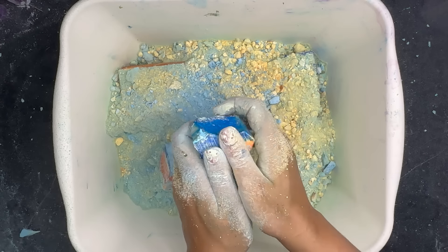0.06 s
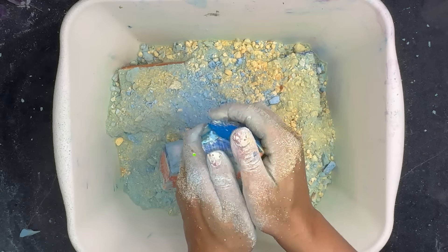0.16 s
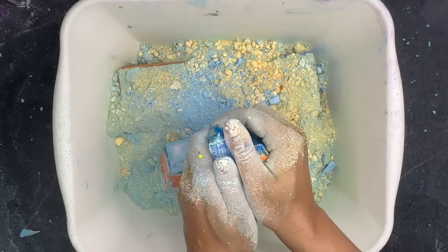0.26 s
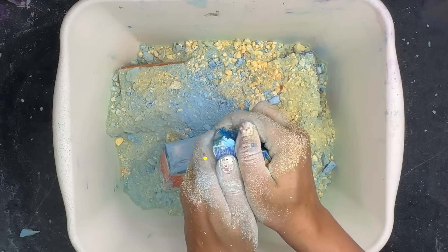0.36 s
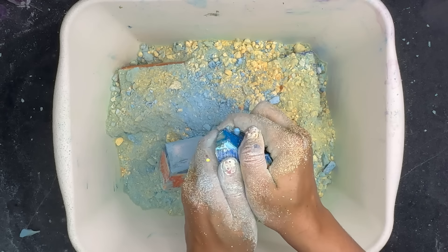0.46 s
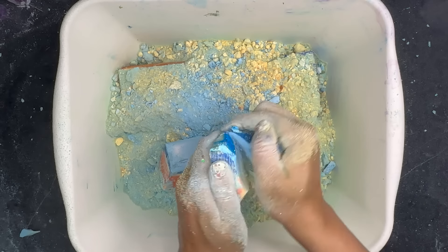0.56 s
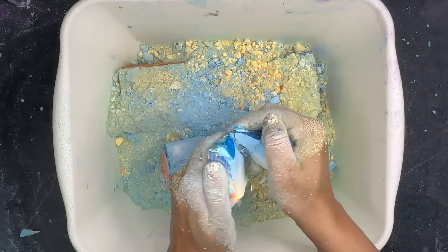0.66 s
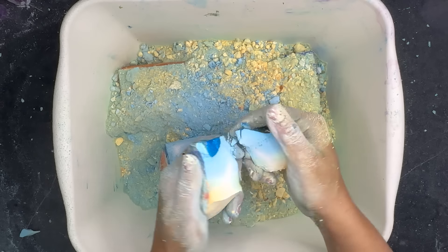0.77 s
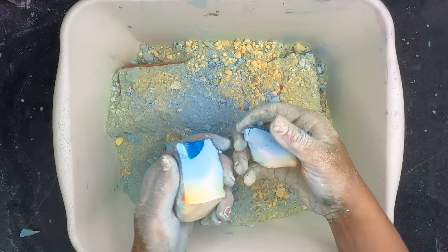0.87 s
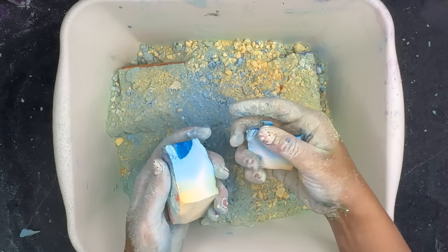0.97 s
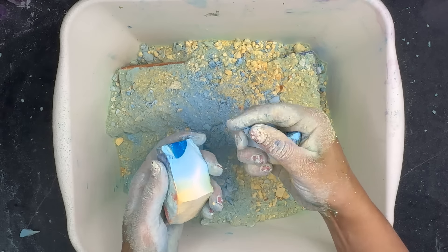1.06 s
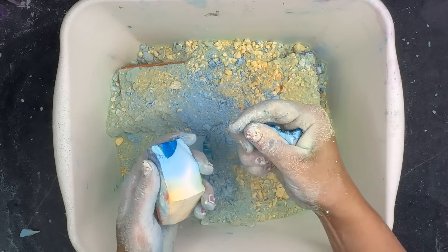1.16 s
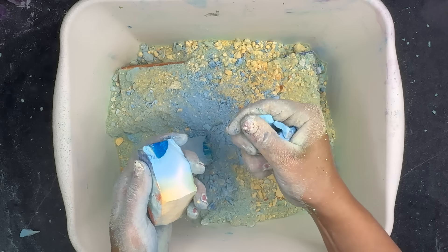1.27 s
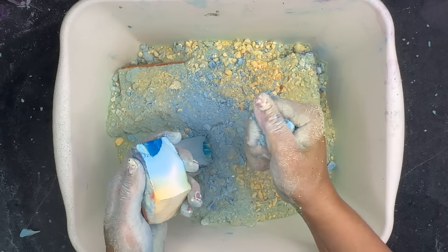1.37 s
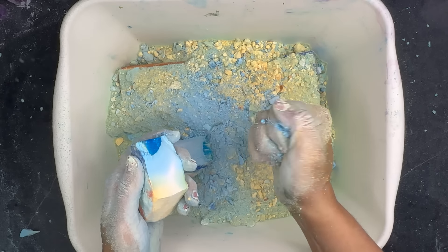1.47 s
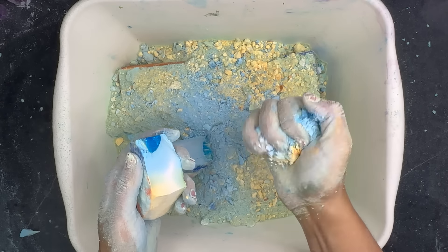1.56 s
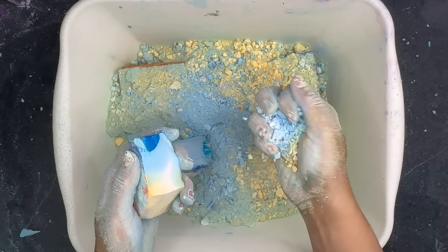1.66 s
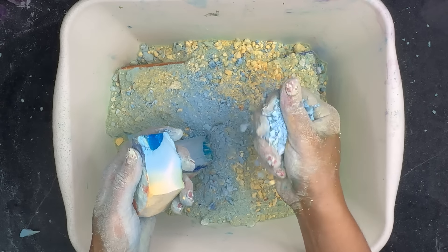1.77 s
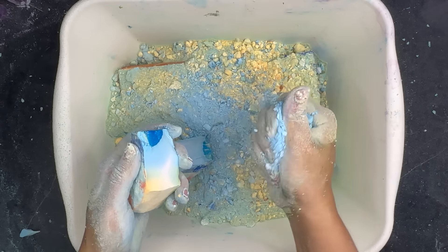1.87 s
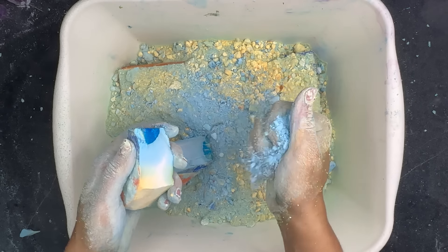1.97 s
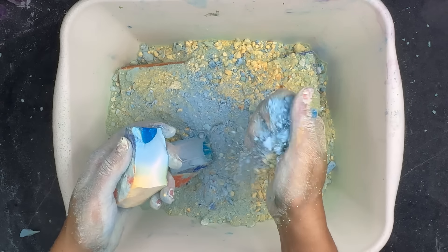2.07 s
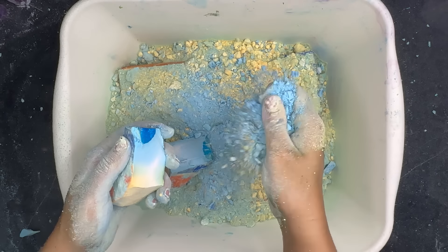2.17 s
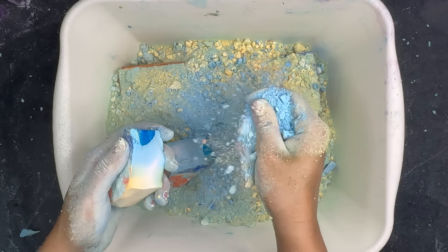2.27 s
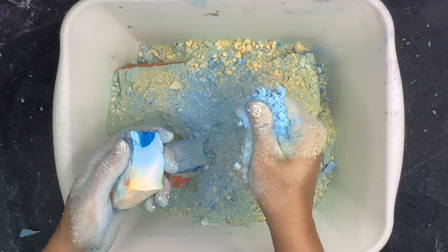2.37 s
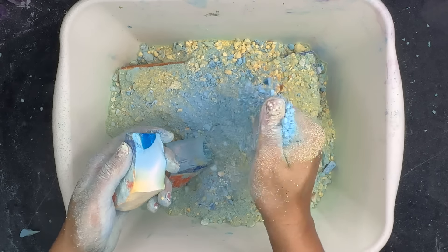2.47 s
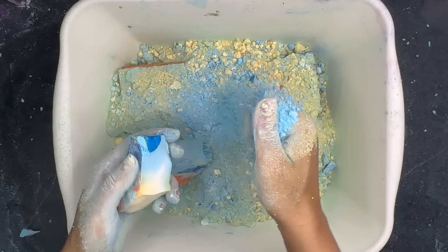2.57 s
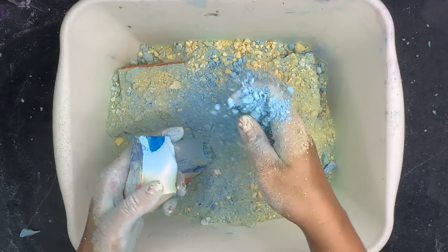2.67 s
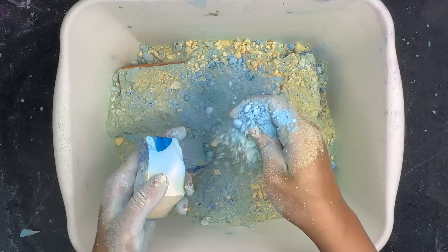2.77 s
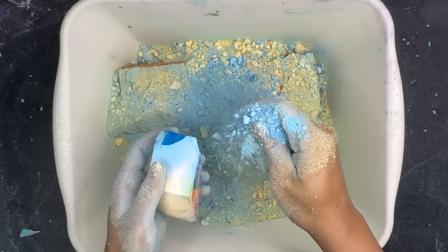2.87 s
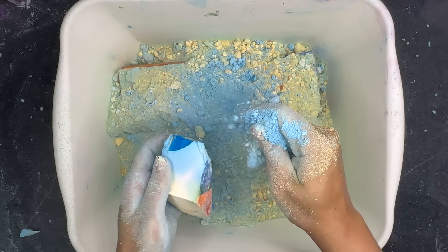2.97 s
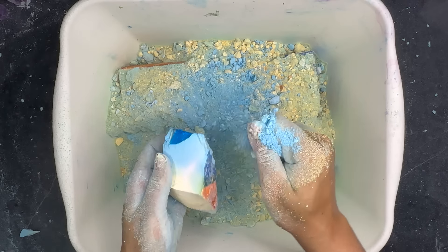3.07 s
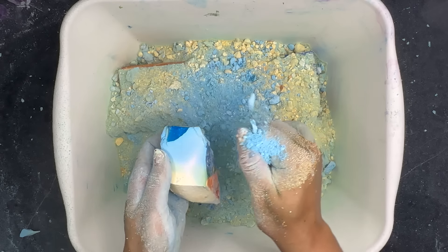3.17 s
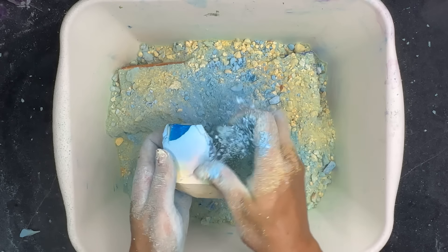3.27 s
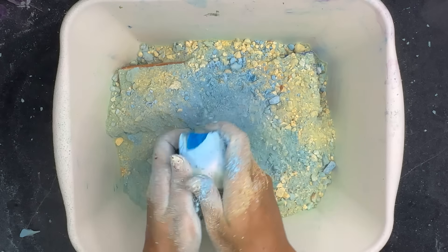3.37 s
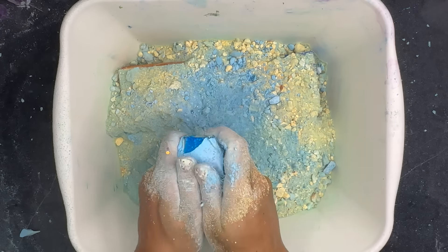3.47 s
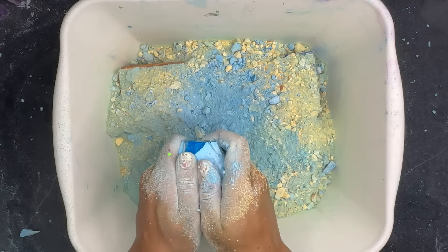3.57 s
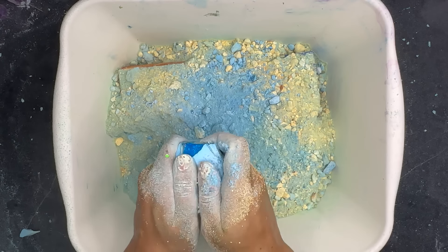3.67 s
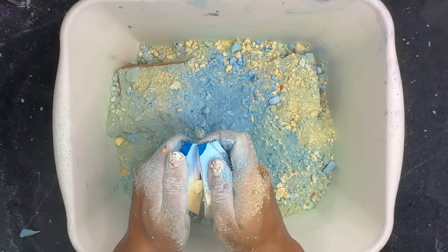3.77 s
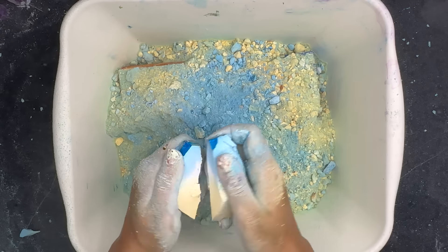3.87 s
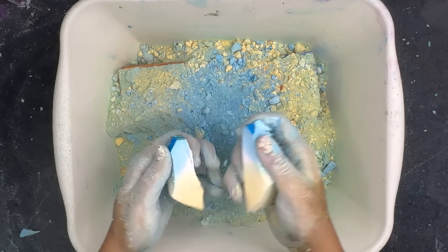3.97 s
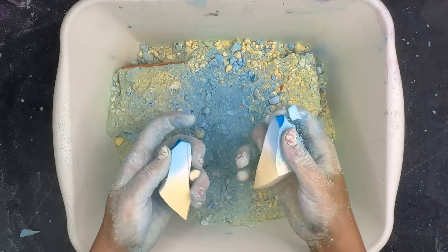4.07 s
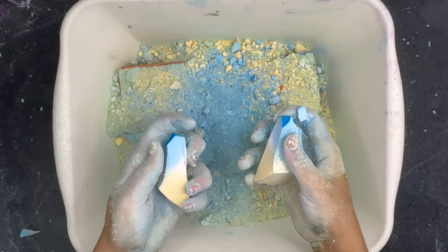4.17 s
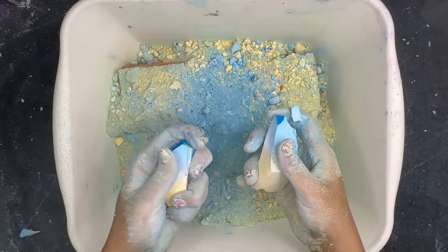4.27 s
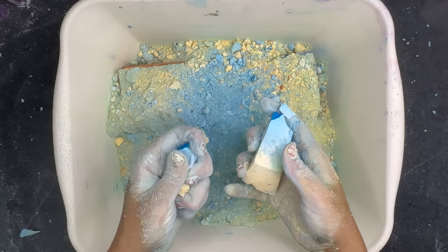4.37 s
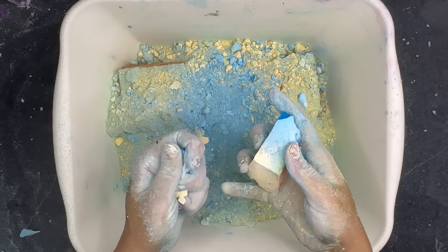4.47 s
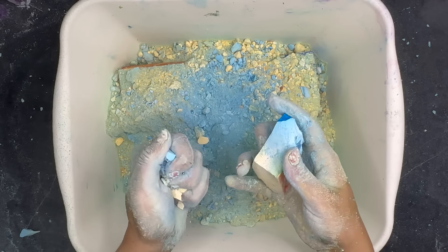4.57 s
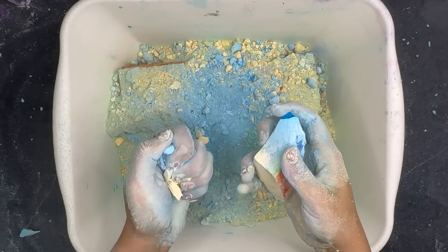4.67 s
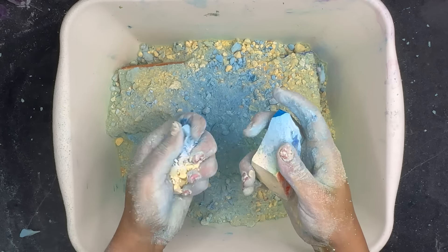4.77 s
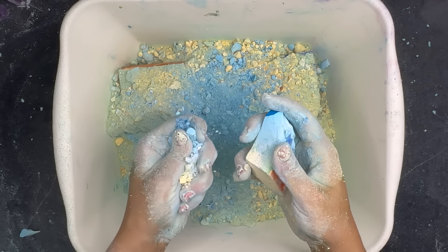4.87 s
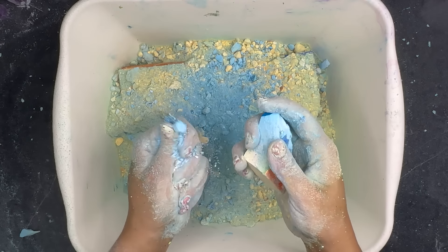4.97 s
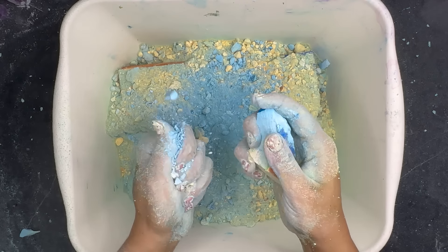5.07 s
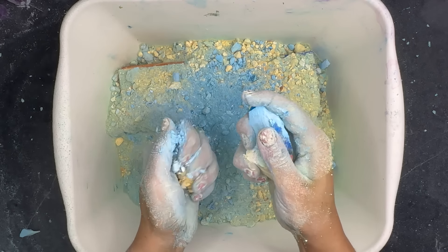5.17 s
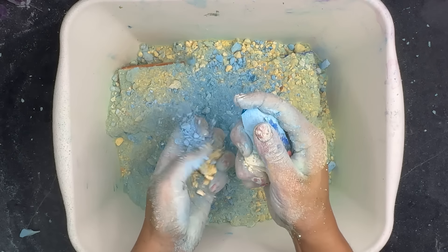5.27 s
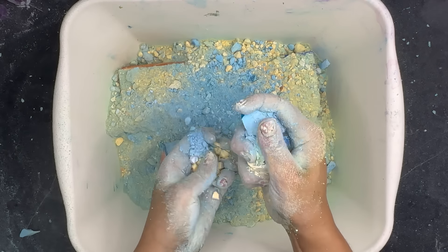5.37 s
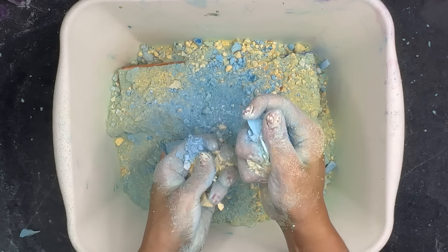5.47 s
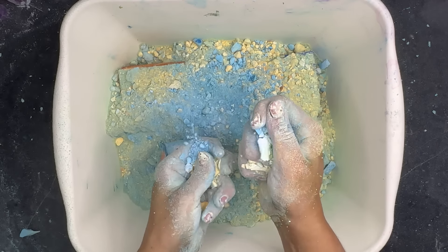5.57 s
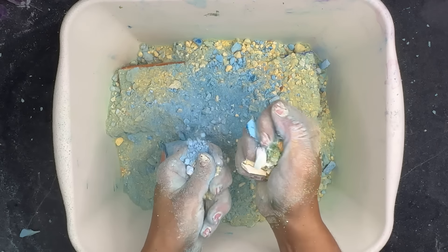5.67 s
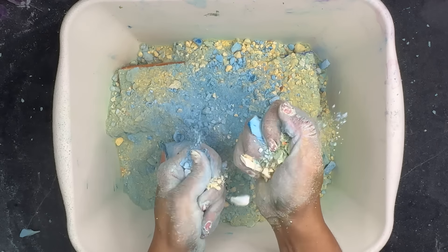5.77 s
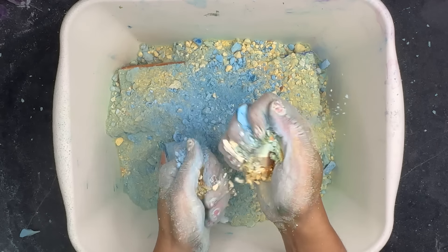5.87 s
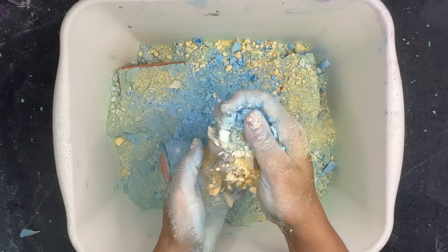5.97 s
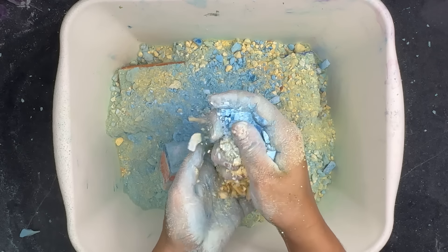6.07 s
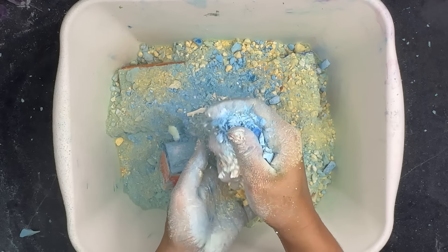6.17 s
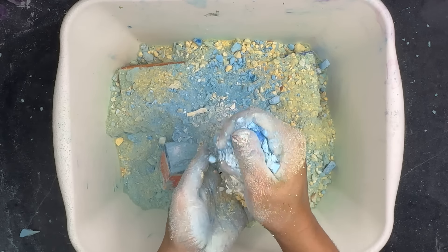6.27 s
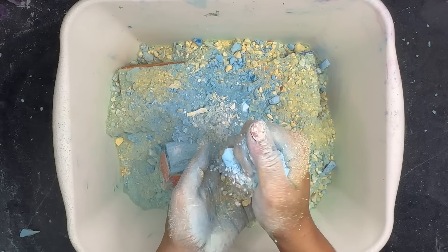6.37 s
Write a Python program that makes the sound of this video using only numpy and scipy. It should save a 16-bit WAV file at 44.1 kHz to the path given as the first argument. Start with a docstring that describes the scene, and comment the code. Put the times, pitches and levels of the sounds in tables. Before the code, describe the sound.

Close to a stereo microphone in a quiet room, hands rub powdery chalk, then break a block with a snap and crush it in a burst of crunches. A heavy lump falls with a low thump. Softer squeezing and trickling follow, then a rub, a very sharp crack and dense crumbling to the end, over a faint low hum.

```python
"""A low room drone and soft powdery rubbing come first; then hands break and crumble blocks of gym chalk over a tub.
Blocks snap and ring as short sine tones in the cupped hands, with noise for the crack and a spray of crumbs.
Crumbs grind as clumped filtered clicks, chips tick as tiny sines, lumps thud as low noise in the chalk bed.
A close pair of microphone ports hears it in a quiet room, with echoes from tub, walls and room."""
import sys
import numpy as np
from scipy import signal
from scipy.fft import rfft, irfft, next_fast_len
from scipy.io import wavfile
from scipy.ndimage import uniform_filter1d

SR = 44100
rng = np.random.default_rng(int(sys.argv[2]) if len(sys.argv) > 2 else 0)


def transcribe(signal):
    """Save signal, clipped to [-1, 1], as a 16-bit WAV file at the path in sys.argv[1]."""
    frames = np.atleast_2d(signal).T
    limited = np.clip(frames, -1, 1)
    pcm = np.round(limited * 32767).astype(np.int16)
    wavfile.write(sys.argv[1], SR, pcm)


N = 282681
TIME = np.arange(N) / SR

# spectrum of splitting chalk: frequency_hz, level_db (relative, per Hz)
CRACK_SPECTRUM = [(300, -26), (900, -22), (2400, 8.5), (3200, -4), (4200, 6), (5100, 1), (6500, 8.5),
                  (8500, 1.5), (15000, 3.5)]
# the fingers close on the crumbs: peak_s, grinding_db, hold_s, treble_db
# loose powder is dull, fresh shards are bright
SQUEEZES = [(1.078, -51.5, 0.12, 6.5), (1.207, -39.5, 0.1, 0), (1.315, -39, 0.0054, 8),
            (1.45, -50, 0.61, 6.5), (1.69, -46.5, 0.3, 1.5), (2.102, -47.5, 0.15, -2.5),
            (2.267, -45.5, 0.16, 0), (2.54, -49.5, 0.26, 0), (2.756, -46.5, 0.041, 6.5),
            (2.94, -50.5, 0.13, 4), (4.384, -42, 0.054, 13), (4.739, -48, 0.092, 6.5),
            (4.924, -47.5, 0.085, 7), (5.194, -44, 0.06, 4.5), (5.31, -42, 0.18, 3),
            (5.592, -40, 0.051, 3.5), (5.863, -46.5, 0.061, 5), (6.087, -46.5, 0.13, 5.5),
            (6.313, -48, 0.089, 4.5)]


def from_db(db):
    """Decibels to gain."""
    return 10 ** (np.asarray(db) / 20)


def rms_one(x):
    """Scale to an rms of 1."""
    return x / np.sqrt(np.mean(x ** 2) + 1e-20)


def unit_blow(x):
    """Scale to the energy of one millisecond at rms 1."""
    return x / np.sqrt(np.sum(x ** 2) * 1000 / SR + 1e-20)


def dying(t, t60):
    """Envelope that falls 60 dB in t60 seconds."""
    return from_db(-60 * t / max(t60, 1e-4))


def add(track, s, sound):
    """Mix a sound into a track at a time in seconds."""
    i = int(round(s * SR))
    track[i:i + len(sound)] += sound[:N - i]


def butter_filter(x, order, edge_hz, kind):
    """Run a sound through a causal Butterworth filter."""
    return signal.sosfilt(signal.butter(order, edge_hz, kind, fs=SR, output="sos"), x)


def colour(x, spectrum, size=4096):
    """Causal minimum-phase filter with the given spectrum and unit power gain for white noise."""
    hz, level_db = np.transpose(spectrum)
    grid = np.maximum(np.arange(size // 2 + 1) * SR / size, 1)
    grid_db = np.interp(np.log(grid), np.log(hz), level_db)
    # folding the cepstrum forward in time makes the response causal
    cepstrum = irfft(np.log(from_db(grid_db)))
    cepstrum[1:size // 2] *= 2
    cepstrum[size // 2 + 1:] = 0
    response = irfft(np.exp(rfft(cepstrum)))
    return signal.fftconvolve(x, response / np.sqrt(np.sum(response ** 2)))[:N]


def drift(per_s):
    """Random wandering with an rms of 1, through per_s new values a second."""
    knots = rng.standard_normal(N // 40)
    return rms_one(np.interp(TIME * per_s, np.arange(len(knots)), knots))


def grains(per_s, spread_db, clump_db, own_db, count=9):
    """Tiny fractures come in clumps; each has its own size and its own strength in every band."""
    born = rng.random(N) < per_s / SR
    size_db = spread_db * np.minimum(rng.exponential(1, N), 4.5)
    sizes = from_db(size_db + clump_db * drift(190))
    clicks = born * sizes * rng.choice([-1, 1], N) + 1e-18
    edges_hz, out = np.geomspace(150, 17000, count + 1), 0
    for band in zip(edges_hz, edges_hz[1:]):
        own = from_db(own_db * rng.standard_normal(N)) * rng.choice([-1, 1], N)
        out = out + butter_filter(clicks * own, 2, band, "band")
    return rms_one(out)


def jerks(t, span_s, t60, count=4):
    """Envelope of a crack that advances in a few quick steps of uneven strength."""
    step = np.arange(count)
    # the first step is at once, the others at random within their share of the span
    starts = span_s * (step + rng.random(count) * (step > 0)) / count
    sizes = from_db(rng.normal(0, 0.49, count) - 7 * starts / span_s)
    steps = [size * (t > start) * dying(np.abs(t - start), t60) for start, size in zip(starts, sizes)]
    return unit_blow(sum(steps))


def echoes(x, t60, delay_s, top_hz):
    """Dense reflections that start after a delay and die away, dulled by the walls."""
    t = np.arange(SR // 2) / SR
    tail = rng.standard_normal(len(t)) * dying(t, t60) * (t > delay_s)
    tail = butter_filter(tail / np.sqrt(np.sum(tail ** 2)), 1, top_hz, "low")
    return signal.fftconvolve(x, tail)[:N]


def hum(hum_db=-41, side_db=-64):
    """The room's low drone is alike at both ports; its faint airy part has opposite sign at each."""
    # quiet room: frequency_hz, level_db (relative, per Hz)
    room_tone = [(25, -11.5), (35, -25.5), (49, 2), (72, 2), (125, -6.5), (330, -26.5), (1200, -43),
                 (6500, -42.5), (16000, -81)]
    drone = colour(rng.standard_normal(N), room_tone)
    air = colour(rng.standard_normal(N), [(500, -18.0), (16000, -66.0)])
    return from_db(hum_db) * drone + from_db(side_db) * air * [[1], [-1]]


def rubbing(pitch_db=7, pitch_q=3.2):
    """Powdery faces rub with a noise hiss that swells with each stroke and is lifted around its own pitch."""
    # powdery hisses, palms and fingers sliding, broken faces scraping:
    # middle_s, level_db, length_s (middle to -17 dB), pitch_hz
    strokes = [(0.075, -43.5, 0.064, 6400), (0.22, -54, 0.063, 5000), (0.303, -47, 0.033, 5500),
               (0.572, -30.5, 0.033, 2320), (0.74, -51, 0.17, 2300), (0.836, -46.5, 0.1, 6800),
               (0.988, -45.5, 0.042, 7040), (3.414, -42, 0.15, 6000), (3.871, -38.5, 0.041, 2060),
               (3.953, -34, 0.038, 7700), (4.046, -35, 0.063, 8040), (4.233, -50.5, 0.1, 6800),
               (4.46, -41.5, 0.2, 6700), (5.086, -40, 0.09, 8800)]
    # powdery hiss: frequency_hz, level_db (relative, per Hz)
    rub_spectrum = [(1200, -13), (2200, -5), (9000, -5.5), (15000, 3.5)]
    flickering = rng.standard_normal(N) * from_db(4.0 * drift(200))
    hiss, out = colour(flickering, rub_spectrum), 0
    for s, level_db, length, hz in strokes:
        pitched = signal.lfilter(*signal.iirpeak(hz, pitch_q, fs=SR), hiss)
        stroke = rms_one(hiss + from_db(pitch_db) * pitched)
        swell = np.exp(-2 * ((TIME - s) / length) ** 2)
        out = out + from_db(level_db) * swell * stroke
    return out


def thuds(rise_share=0.0029, low_hz=64, tumble_db=-0.5):
    """The bed and tub take each lump with a dull, uneven noise rumble; long ones begin more softly."""
    # lumps and hands landing on the chalk bed: start_s, level_db, top_hz (upper edge), t60_s
    falls = [(0.365, -43.5, 1150, 0.36), (0.543, -27.5, 470, 0.3), (1.237, -32, 575, 0.21),
             (1.579, -38, 635, 0.49), (1.593, -28.5, 270, 0.24), (2.549, -39, 357, 0.95),
             (3.14, -49.5, 382, 0.78), (3.693, -33.5, 1130, 0.32), (5.182, -32.5, 440, 0.12),
             (5.322, -33, 554, 0.21)]
    t, out = np.arange(SR // 2) / SR, np.zeros(N)
    for s, level_db, top_hz, t60 in falls:
        # keep the late half of the noise, when the filter has settled
        body = butter_filter(rng.standard_normal(SR), 3, [low_hz, top_hz], "band")[-len(t):]
        body = body * from_db(tumble_db * drift(87)[:len(t)])
        evened = body / np.sqrt(uniform_filter1d(body ** 2, size=1800))
        rise = 1 - np.exp(-t / (rise_share * t60))
        add(out, s, from_db(level_db) * evened * rise * dying(t, t60))
    return out


def tub_floor(start_s=1.592, hz=85, level_db=-12, rise_s=0.043, t60=0.22):
    """A heavy fall of powder sets the tub's floor swinging in one round, low sine note."""
    t = np.maximum(TIME - start_s, 0)
    swell = (1 - np.exp(-t / rise_s)) * dying(t, t60)
    return from_db(level_db) * np.sin(2 * np.pi * hz * t) * swell


def grip_db(close_db_per_s=443.5, sag_db_per_s=11.5, release_s=0.2, rest_db=-80.0):
    """Each squeeze builds quickly, sags as crumbs give way, and lets go ever faster to a resting grip."""
    level_db = np.full(N, rest_db)
    for s, peak_db, hold, _ in SQUEEZES:
        t = TIME - s
        closing_db = close_db_per_s * np.maximum(-t, 0)
        sag_db = sag_db_per_s * np.clip(t, 0, hold)
        letting_go_db = 20 * (np.maximum(t - hold, 0) / release_s) ** 2   # 20 dB in release_s
        level_db = np.maximum(level_db, peak_db - (closing_db + sag_db + letting_go_db))
    return level_db


def grip_effort(squeeze_db):
    """Square root of the grinding gain, 1 under the hardest grip."""
    return np.sqrt(from_db(squeeze_db - squeeze_db.max()))


def crumbling(squeeze_db, grit_db=-1, sharp_db=-10.0, catch_db=2.5, treble_edge_hz=2800):
    """Crumbs grind densely under the fingers, catching and giving way unevenly, with sharp ticks among them."""
    # grinding crumbs: frequency_hz, level_db (relative, per Hz)
    grit_spectrum = [(150, 11), (550, 1), (1400, 0), (2450, 4), (3200, -5), (4700, -7.5), (6500, -2),
                     (8500, -5.5), (15000, -20)]
    grit = colour(grains(per_s=5000, spread_db=1.0, clump_db=2.5, own_db=1.0), grit_spectrum)
    ticks = colour(grains(per_s=3600, spread_db=3.5, clump_db=4.5, own_db=-0.5), CRACK_SPECTRUM)
    mixture = from_db(grit_db) * grit + from_db(sharp_db) * ticks
    crumbs = from_db(squeeze_db + catch_db * drift(45)) * mixture
    # the treble gain glides from each squeeze to the next
    peaks_s, _, _, treble_db = np.transpose(SQUEEZES)
    dull = signal.sosfiltfilt(signal.butter(2, treble_edge_hz, fs=SR, output="sos"), crumbs)
    return dull + from_db(np.interp(TIME, peaks_s, treble_db)) * (crumbs - dull)


def crunches(squeeze_db, low_hz=700, high_hz=2600, cave_s=0.003, step_t60=0.0026,
             fragments_s=0.016, fragments_db=-10):
    """Clumps cave in without ringing, faster under a light grip; their fragments grind on a little longer."""
    # clumps giving way: start_s, body_db, crack_db (energy per millisecond)
    clumps = [(0.5534, -36, -27.5), (0.5708, -28, -14.5), (1.146, -35, -15.5), (1.161, -22.5, -20),
              (1.2762, -21.5, -18.5), (1.3044, -25, -16), (1.3265, -20.5, -14.5), (1.4005, -51, -22),
              (1.431, -39, -22.5), (1.717, -33, -47), (2.3, -36, -27), (2.4547, -39.5, -34.5),
              (2.755, -29.5, -32), (2.981, -24, -19), (3.0391, -29, -25), (3.5747, -38, -37.5),
              (4.2868, -41, -27.5), (4.3118, -28, -23.5), (4.4208, -23.5, -8), (4.475, -23, -21.5),
              (4.501, -29.5, -19), (4.7799, -32, -33), (4.8546, -26, -47), (5.025, -60, -27.5),
              (5.0625, -38, -25.5), (5.0784, -36, -21.5), (5.094, -57, -24.5), (5.182, -17, -10.5),
              (5.2644, -24.5, -24), (5.3872, -23, -46), (5.409, -20.5, -18.5), (5.503, -41, -23),
              (5.5268, -46, -16.5), (5.55, -39, -21.5), (5.582, -24.5, -21.5), (5.6321, -21, -14.5),
              (5.6565, -20.5, -19.5), (5.68, -63, -19), (5.7081, -51, -21.5), (5.8129, -33, -29.5),
              (5.9162, -24, -21), (5.9603, -27, -39), (5.9914, -29, -16.5), (6.0527, -35, -16),
              (6.0625, -31, -34), (6.0929, -38, -18), (6.111, -16, -16.5), (6.1307, -24, -25),
              (6.1513, -28, -31), (6.245, -27.5, -18.5), (6.33, -32, -23), (6.34, -20, -21),
              (6.3505, -42, -24.5)]
    t = np.arange(SR // 20) / SR
    bodies, cracks = np.zeros((2, N))
    effort = grip_effort(squeeze_db)
    for s, dull_db, sharp_db in clumps:
        # cave_s is the span under the hardest grip
        caving = jerks(t, cave_s * np.interp(s, TIME, effort), step_t60)
        fragments = from_db(fragments_db) * jerks(t, fragments_s, step_t60)
        dull, sharp = (caving + fragments) * rng.standard_normal((2, len(t)))
        muffled = butter_filter(dull, 2, [low_hz, high_hz], "band")
        add(bodies, s, from_db(dull_db) * unit_blow(muffled))
        add(cracks, s, from_db(sharp_db) * unit_blow(sharp))
    return bodies + colour(cracks, CRACK_SPECTRUM)


def chips(squeeze_db, per_s=420, chip_db=0, size_spread_db=5, middle_hz=2100, spread_octaves=1.0, cycles=7):
    """Chips break off at random, each a sine tick at its own pitch; a harder squeeze gives more and louder ones."""
    t, out = np.arange(SR // 50) / SR, np.zeros(N)
    # per_s is the rate under the hardest grip
    born = rng.random(N) < per_s / SR * grip_effort(squeeze_db)
    size, pitch = np.clip(rng.standard_normal((2, N)), -2, 2)
    for i in np.flatnonzero(born):
        hz = middle_hz * 2 ** (spread_octaves * pitch[i])
        tick = unit_blow(np.sin(2 * np.pi * hz * t) * dying(t, cycles / hz))
        level_db = squeeze_db[i] + chip_db + size_spread_db * size[i]
        add(out, i / SR, (-1) ** i * from_db(level_db) * tick)
    return out


def hand_hollow(t):
    """The air in the cupped hands rings in a few short modes, retuned at random with the grip of each break."""
    # hollow of the cupped hands: pitch_hz, level_db, t60_s
    hollow_modes = [(1096, 1, 0.008), (1560, 0.5, 0.0046), (2314, 6, 0.0061)]
    out = 0
    for hz, level_db, t60 in hollow_modes:
        gain = from_db(level_db + rng.normal(0, 1.1))
        turns = hz * np.exp(rng.normal(0, 0.14)) * t + rng.random()
        out = out + gain * np.sin(2 * np.pi * turns) * dying(t, t60)
    return out


def snaps(span_s=0.0025, step_t60=0.0017, rise_s=0.00022, hollow_db=-4.0, hollow_low_hz=560,
          overtone=1.76, overtone_db=-7, debris_db=-10, debris_t60=0.088, start_sharp=0.55, settle_cycles=1.0):
    """A crack runs through the block; the piece and the hands' hollow ring, and crumbs spray."""
    # a solid piece splits: start_s, ring_db, ring_hz, ring_t60_s, crack_db (levels: energy per millisecond)
    breaks = [(0.5406, -14, 416, 0.011, -18.5), (1.1303, -13, 2390, 0.016, -16),
              (1.211, -18.5, 2500, 0.025, -21), (1.233, -8, 2340, 0.014, -16.5),
              (1.2335, -9.5, 790, 0.0075, -13), (2.796, -24.5, 2340, 0.056, -31),
              (2.9396, -14.5, 2280, 0.031, -23.5), (3.6909, -10.5, 760, 0.0075, -18.5),
              (4.3243, -24, 3040, 0.0055, -11), (4.3695, -11.5, 2350, 0.0082, -11),
              (4.374, -5.5, 2390, 0.0077, 2.5), (5.3214, -8, 803, 0.0059, -4.5),
              (5.4496, -20, 2340, 0.0043, -13.5), (5.4826, -28.5, 930, 0.0074, -5),
              (5.5967, -18.5, 2700, 0.048, -13.5)]
    t = np.arange(SR // 10) / SR
    rings, cracks, spray = np.zeros((3, N))
    opening = 1 - np.exp(-(t / rise_s) ** 2)
    for s, ring_db, hz, t60, crack_db in breaks:
        # the ring starts sharp by this share of its pitch and falls to it in a cycle or two
        settled = 1 - np.exp(-hz * t / settle_cycles)
        gliding_hz = hz * (1 + start_sharp * (1 - settled))
        phase = 2 * np.pi * np.cumsum(gliding_hz) / SR
        tones = np.sin(phase) + from_db(overtone_db) * np.sin(overtone * phase)
        add(rings, s, from_db(ring_db) * unit_blow(settled ** 2 * tones * dying(t, t60)))
        hollow = butter_filter(opening * hand_hollow(t), 2, hollow_low_hz, "high")
        add(rings, s, from_db((crack_db + ring_db) / 2 + hollow_db) * unit_blow(hollow))
        tearing = opening * jerks(t, span_s, step_t60) * rng.standard_normal(len(t))
        add(cracks, s, from_db(crack_db) * unit_blow(tearing))
        add(spray, s, from_db(crack_db + debris_db) * unit_blow(opening * dying(t, debris_t60)))
    debris = spray * grains(per_s=3500, spread_db=-5.0, clump_db=5.0, own_db=-0.5)
    return rings + colour(cracks + debris, CRACK_SPECTRUM)


def scene(tub_db=-15, wall_db=-17, room_db=-22, scatter_db=0.6):
    """Tub floor echoes alike at both ports, side walls with opposite sign, the room faintly and later."""
    squeeze_db = grip_db()
    fine = crumbling(squeeze_db) + rubbing() + crunches(squeeze_db) + chips(squeeze_db)
    blows = snaps() + thuds() + tub_floor()
    chalk = fine + blows
    # the fine sounds waver quickly a little to the left and right
    direct = blows + fine * from_db(scatter_db * drift(570) * [[1], [-1]])
    tub = echoes(chalk, t60=0.03, delay_s=0.004, top_hz=7150)
    walls = echoes(chalk, t60=0.014, delay_s=0.00098, top_hz=5730) * [[1], [-1]]
    room = np.array([echoes(chalk, t60=0.38, delay_s=0.022, top_hz=4000) for port in range(2)])
    reflected = from_db(tub_db) * tub + from_db(wall_db) * walls + from_db(room_db) * room
    return direct + reflected + hum()


def record(dry):
    """The two ports part in phase toward the treble; peaks beyond full scale clip and the top is cut."""
    # phase by which the left port leads: frequency_hz, lead_rad
    port_phase = [(0, 0), (4900, 0), (10800, 2.95), (16000, 4.2)]
    size = next_fast_len(N + SR // 10)
    hz = np.arange(size // 2 + 1) * SR / size
    lead = np.interp(hz, *np.transpose(port_phase))
    # half the lead goes to each port
    ports = irfft(rfft(dry, size) * np.exp(.5j * lead * [[1], [-1]]), size)[:, :N]
    top_cut = signal.ellip(10, .2, 80, 16200, fs=SR, output="sos")   # ripple dB, stop dB, edge Hz
    return signal.sosfilt(top_cut, np.clip(ports, -1, 1))


dry = scene()
out = record(dry)
transcribe(out)
```